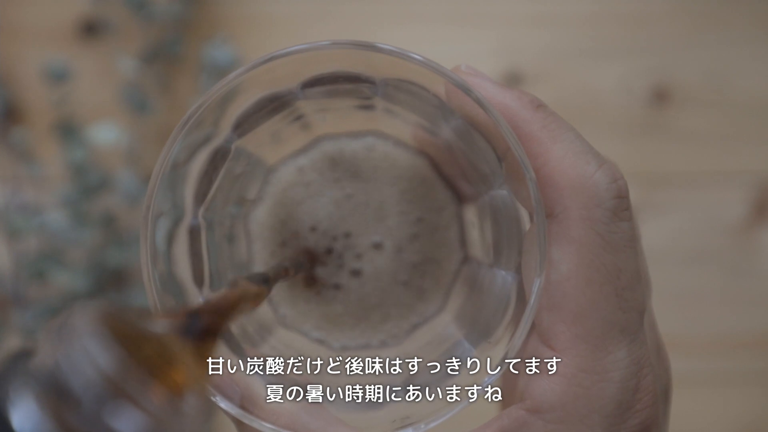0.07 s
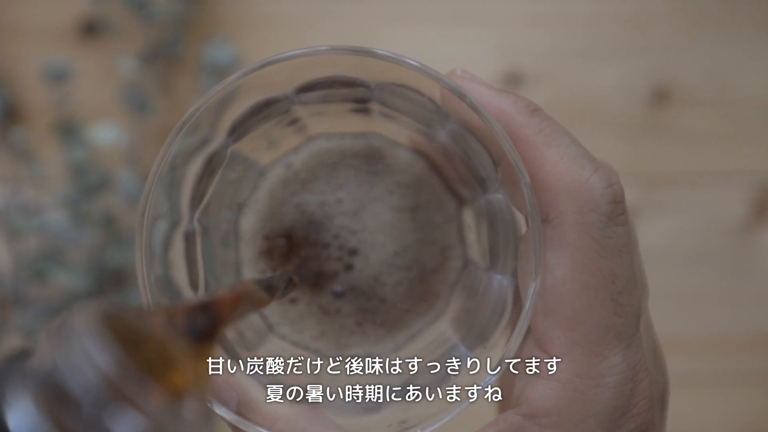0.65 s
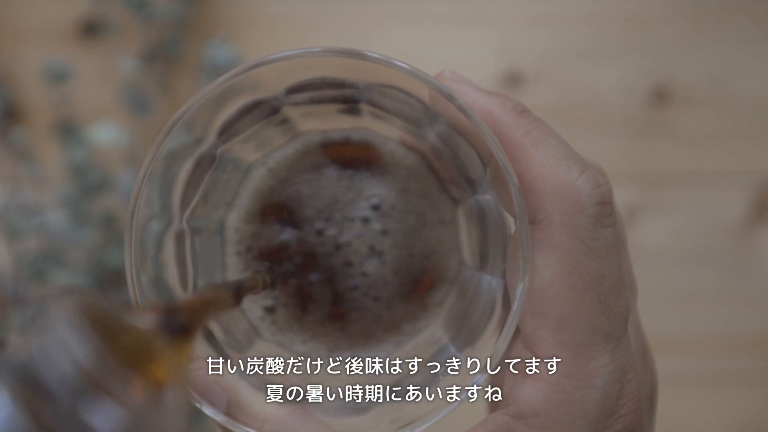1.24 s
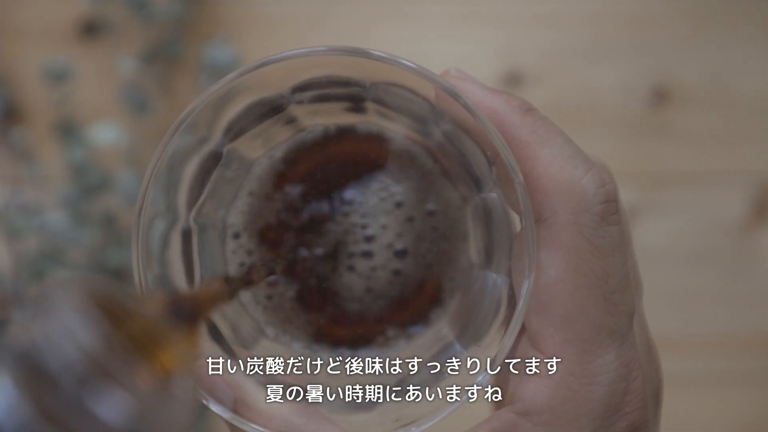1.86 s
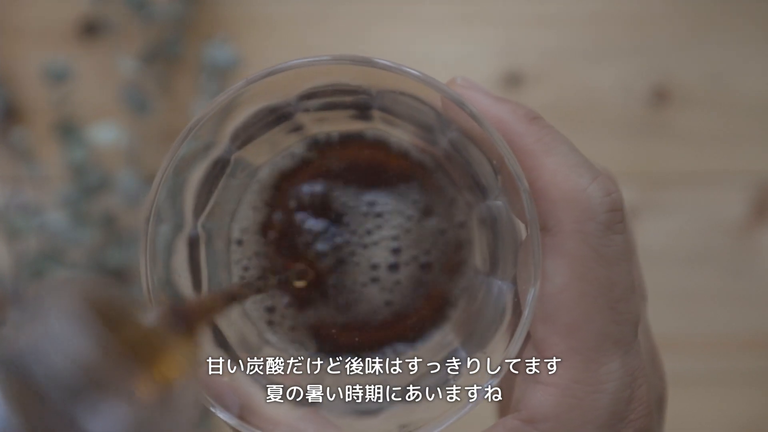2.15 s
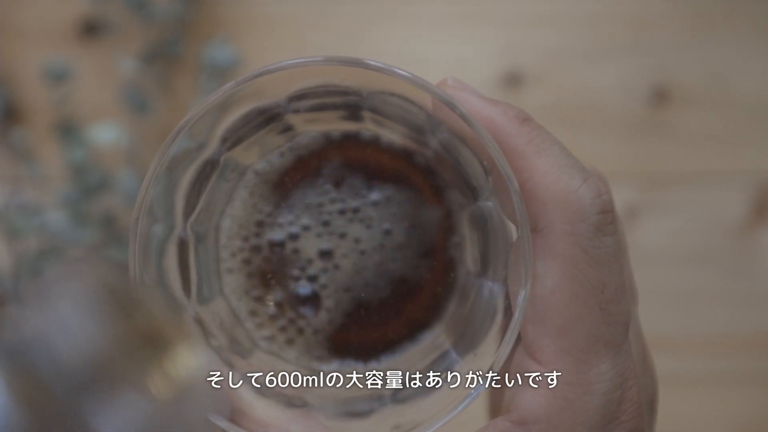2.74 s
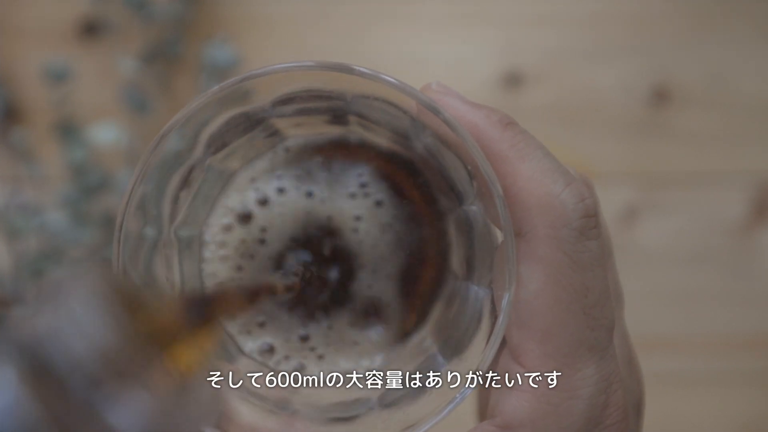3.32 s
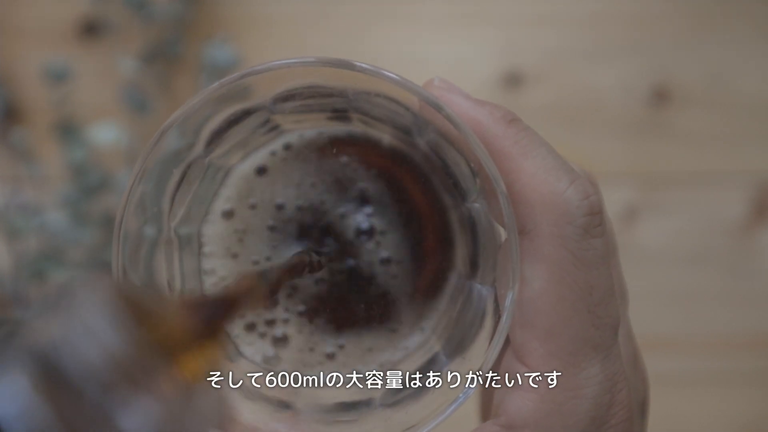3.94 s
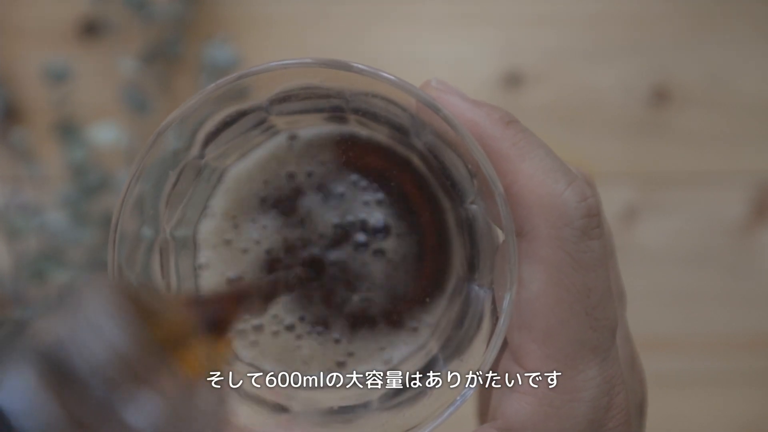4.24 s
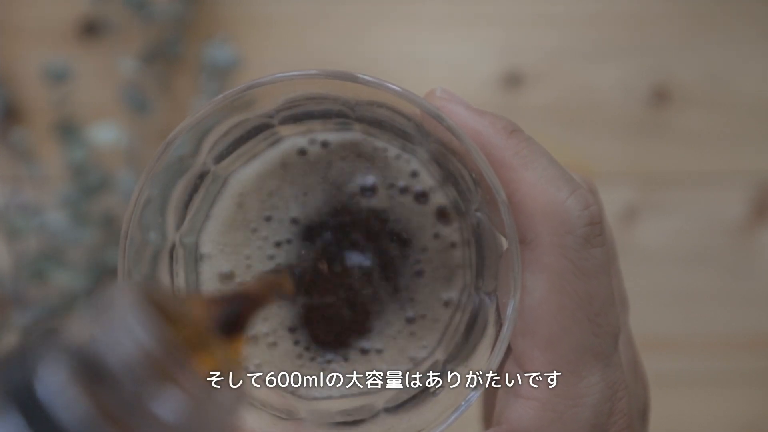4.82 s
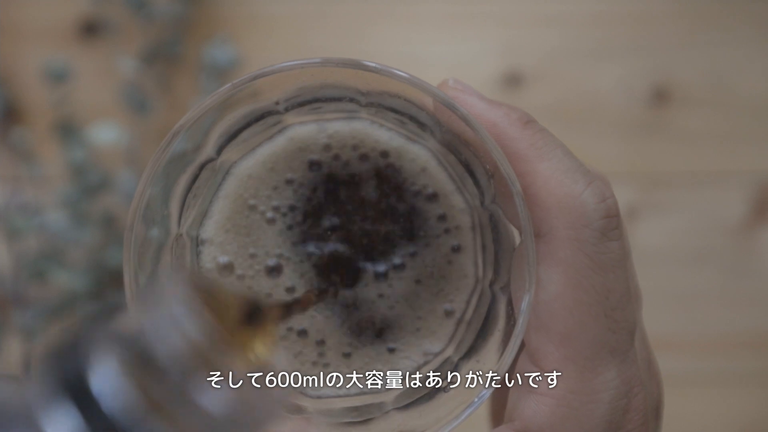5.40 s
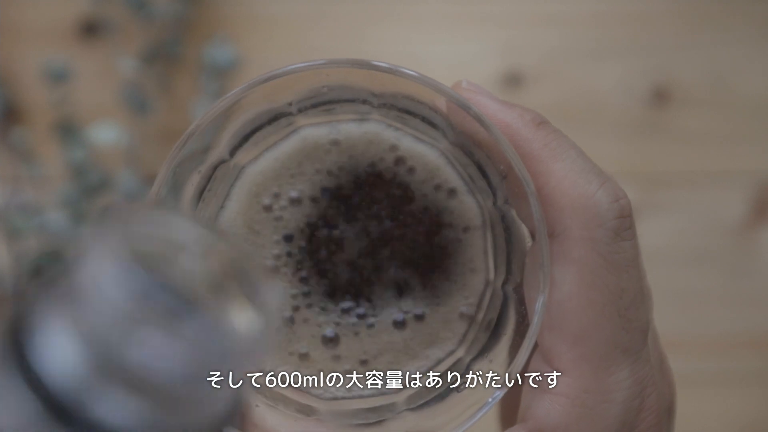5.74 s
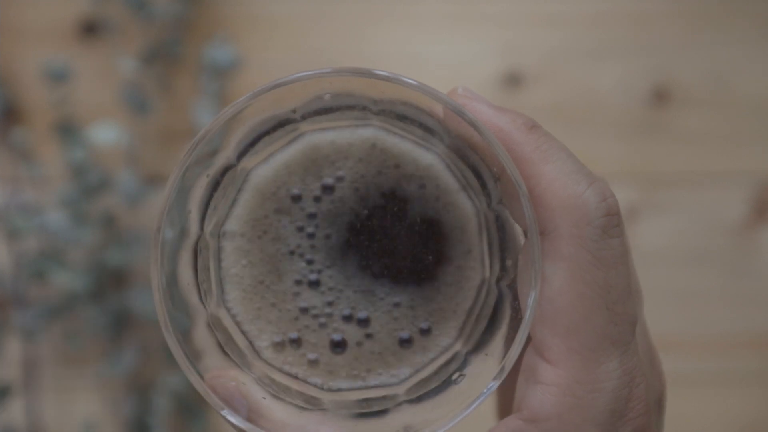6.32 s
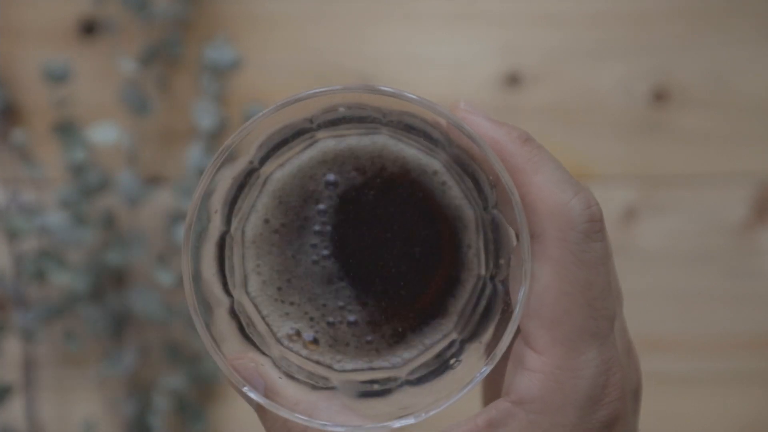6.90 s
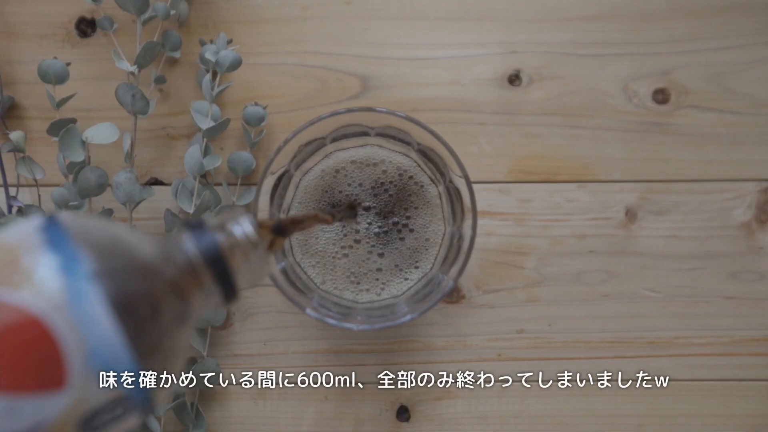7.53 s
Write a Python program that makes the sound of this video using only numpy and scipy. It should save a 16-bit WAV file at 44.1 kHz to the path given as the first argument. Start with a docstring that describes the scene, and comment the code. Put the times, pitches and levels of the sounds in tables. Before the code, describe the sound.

Close up, a carbonated drink splashes and plops into a hand-held glass in two pours, then fizzes as the foam settles.

```python
"""At a table in a quiet room, fizzy drink is poured twice into a glass held close to the microphone.
Trapped air plops and patters, the foam hisses, and the hollow of the glass rings higher as it fills.
The hand shifts on the glass with dull knocks at the start and the end.
In the last quarter second the sound cuts to a much fainter pour, farther off."""
import sys
import numpy as np
from scipy import signal
from scipy.fft import rfft, irfft
from scipy.io import wavfile
from scipy.ndimage import uniform_filter1d

SR = 44100
rng = np.random.default_rng(int(sys.argv[2]) if len(sys.argv) > 2 else 0)


def dump_mix(stems):
    """Bounce the given channels to the path in sys.argv[1] as a 16-bit WAV at rate SR."""
    frames = np.atleast_2d(stems).T  # one column per channel
    limited = np.clip(frames, -1, 1)  # hard clip at full scale
    pcm = np.round(limited * 32767).astype(np.int16)
    wavfile.write(sys.argv[1], SR, pcm)


N = 333396
TIME = np.arange(N) / SR
SIDE = np.array([[1], [-1]])  # opposite signs in the left and right channels


def gain_of(db):
    """Decibels to a factor."""
    return 10 ** (np.asarray(db) / 20)


def unit_rms(x):
    """Scales to rms 1."""
    return x / np.sqrt(np.mean(x ** 2) + 1e-20)


def follow(curve):
    """A curve's value at every sample."""
    return np.interp(TIME, *np.transpose(curve))


def add(mix, s, sound):
    """Mixes a sound in at time s."""
    part = mix[..., max(round(s * SR), 0):][..., :sound.shape[-1]]
    part += sound[..., :part.shape[-1]]


def coloured(x, points):
    """Gives x a spectrum, at rms 1."""
    hz, db = np.transpose(points)
    shape = np.interp(np.log(np.fft.rfftfreq(N, 1 / SR) + 1), np.log(hz), db)
    return unit_rms(irfft(rfft(x) * gain_of(shape), N))


def resonate(x, hz, width_hz):
    """A steady or moving resonance of gain 1."""
    turn = np.exp(2j * np.pi * np.cumsum(hz * np.ones(N)) / SR)
    decay = np.exp(-np.pi * width_hz / SR)
    return 2 * (turn * signal.lfilter([1 - decay], [1, -decay], x / turn + 1e-18)).real


def ring(x, modes):
    """Passes x through a set of resonances."""
    return sum(gain_of(db) * resonate(x, hz, width) for hz, width, db in modes)


def high_pass(x, hz):
    """Removes what lies under hz."""
    return signal.sosfilt(signal.butter(2, hz, "high", fs=SR, output="sos"), x)


def low_pass(x, hz, order=2):
    """Dulls what lies over hz."""
    return signal.sosfilt(signal.butter(order, hz, fs=SR, output="sos"), x)


def clicks(per_s, spread_db):
    """Random clicks of either sign, many small and a few large."""
    size = gain_of(spread_db * np.minimum(rng.exponential(1, N), 5))
    return size * rng.choice([-1, 1], N) * (rng.random(N) < per_s / SR)


def wander(length_s):
    """A random curve of rms 1 that changes over about length_s."""
    width = max(round(length_s * SR), 1)
    return unit_rms(uniform_filter1d(uniform_filter1d(rng.standard_normal(N), width), width))


# spectrum of the room at the microphone: (frequency [Hz], level [dB])
ROOM_SPECTRUM = [(20, -17), (50, -14.5), (135, -8), (240, -15.5), (800, -21), (1500, -44), (15000, -47.5)]
def room_tone(level_db=-55, side_db=-6):
    """Low murmur of the room's air, all around the microphone."""
    mid, side = coloured(rng.standard_normal((2, N)), ROOM_SPECTRUM)
    return gain_of(level_db) * (mid + gain_of(side_db) * side * SIDE)


# bouts in which the hand shifts on the glass: (start [s], end [s])
HANDLING_BOUTS = [(0.0, 0.75), (6.38, 7.4)]
# the firmest knocks: (time [s])
FIRM_KNOCKS = [0.077, 0.129, 0.17, 0.28, 0.374, 0.503, 0.585, 0.67, 6.459, 6.509, 6.625, 6.665, 6.765,
               6.833, 6.976, 7.11, 7.174]
def handling(firm_db=-36.5, light_db=-42.5, fade_db_per_s=6.5, gap_s=0.055):
    """Firm knocks with random light ones between, weakening through each bout; yields time and level."""
    for start, end in HANDLING_BOUTS:
        for s in FIRM_KNOCKS:
            if start <= s < end:
                yield s, firm_db - fade_db_per_s * (s - start)
        for s in np.arange(start, end, gap_s):
            db = light_db - fade_db_per_s * (s - start)
            yield s + gap_s * rng.random() / 2, db + 2 * rng.standard_normal()


# resonances that the knocks rattle: (frequency [Hz], width [Hz], level [dB])
RATTLE_RESONANCES = [(331, 45, 0.5), (417.4, 22, 9.5), (548, 26, 6.5), (720, 130, -0.5), (810, 41, -2)]
def knocks(thud_hz=92, thud_s=0.0089, rattle_s=0.0076, rattle_db=11):
    """Close up, each knock is a soft low thud and a short rattle that differs between the channels."""
    thuds, shakes, t = np.zeros(N), np.zeros((2, N)), np.arange(SR // 8) / SR
    thud_envelope = t / thud_s * np.exp(1 - t / thud_s)
    rattle_envelope = t / rattle_s * np.exp(1 - t / rattle_s)
    for s, db in handling():
        swing = np.sin(2 * np.pi * thud_hz * rng.uniform(0.89, 1.324) * t)
        add(thuds, s, gain_of(db) * thud_envelope * swing)
        add(shakes, s, gain_of(db) * rattle_envelope * rng.standard_normal((2, len(t))))
    left, right = low_pass(ring(shakes, RATTLE_RESONANCES), 1050, order=4)
    rattle = np.array([1.28 * left, right - 0.036 * left])  # the sides partly swing against each other
    return thuds * gain_of([[-1.6], [1.4]]) + gain_of(rattle_db) * rattle


# hiss of the foam, close up: (time [s], level [dB])
FOAM_LEVEL = [(0, -51.5), (.9, -47.5), (3.2, -47), (3.4, -45), (4.1, -47.5), (5.9, -48), (6.5, -46),
              (7.3, -48)]
# spectrum of that hiss: (frequency [Hz], level [dB])
FOAM_SPECTRUM = [(400, -29), (800, 3), (1900, -16.5), (2900, 0.5), (3900, -6.5), (5300, -2.5), (7500, 3.5),
                 (10000, 0.5), (13000, -2), (15000, -5)]
def foam(level_db=-0.34, wide_db=-13):
    """Thousands of tiny bubbles burst every second; the treble spreads widest across the microphone."""
    bursts = unit_rms(clicks(per_s=7000, spread_db=3.1)) + .3 * rng.standard_normal(N)
    side = coloured(clicks(per_s=7000, spread_db=3), [(3000, -13), (8000, -4), (11000, -8), (13000, -4)])
    hiss = coloured(bursts, FOAM_SPECTRUM) * gain_of([[-1.1], [1.1]])
    return gain_of(follow(FOAM_LEVEL) + level_db) * (hiss + gain_of(wide_db) * side * SIDE)


SURGE_S = 0.019  # time scale of the stream's surges and the sloshing
# main resonance of the air in the glass: (time [s], pitch [Hz])
HOLLOW_PITCH = [(1, 1200), (3.3, 1307), (4.5, 1325), (7, 1430)]
# how far the sloshing bends that pitch: (time [s], rms bend [share of pitch])
SLOSH_DEPTH = [(3.6, .008), (4, 0.078), (5.9, 0.015)]
def hollow_hz():
    """The pitch of the hollow climbs with the fill and wavers as the drink sloshes."""
    return follow(HOLLOW_PITCH) * (1 + follow(SLOSH_DEPTH) * wander(SURGE_S))


# clear ring of the hollow, which the foam damps: (time [s], level [dB])
CLEAR_RING_LEVEL = [(0, 17), (.95, 10.5), (1.3, 8.5), (5, -0.5)]
# a lower ring that shifts between the two pours: (time [s], pitch [Hz])
LOW_RING_PITCH = [(2.5, 930), (4.3, 846)]
# other resonances of the glass and its air: (frequency [Hz], width [Hz], level [dB])
GLASS_RESONANCES = [(1970, 650, 5), (1883, 103, -3), (2720, 490, 4), (3527, 99, 5), (4950, 2100, -1)]
def glass(x, hollow_db, low_db=-1):
    """The hollow of the glass colours what happens inside it on the way to the microphone."""
    hz = hollow_hz()
    hollow = resonate(x, hz, 330) + gain_of(follow(CLEAR_RING_LEVEL)) * resonate(x, hz, 67)
    low = gain_of(low_db) * resonate(x, follow(LOW_RING_PITCH), 77)
    return high_pass(gain_of(hollow_db) * (hollow + low) + ring(x, GLASS_RESONANCES), 740)


def bubble(hz, ring_s, rise):
    """A pinched-off bubble rings; its pitch flicks upward as it reaches the surface and dies."""
    t = np.arange(SR // 16) / SR
    envelope = np.exp(-(t / ring_s) ** 1.5) * (1 - np.exp(-t / .0002))
    pitch = hz * (1 + np.tanh(rise * (t / ring_s) ** 3))
    return envelope * np.sin(2 * np.pi * np.cumsum(pitch) / SR)


def patter(per_s=340, spread_db=1.9, sizes=24):
    """Small bubbles of many sizes, each a few cycles long; the glass colours them."""
    voices = [bubble(hz, 5 / hz, rise=.03) for hz in np.geomspace(900, 3600, sizes)]
    swarm = sum(signal.oaconvolve(clicks(per_s / sizes, spread_db), voice)[:N] for voice in voices)
    return unit_rms(glass(swarm, hollow_db=2.5))


def splats(decay_s=0.0035, spray_db=-9, spray_hz=7500):
    """Lumps of the stream slap the surface: short bursts that sound the glass and throw fine spray."""
    t = np.arange(SR // 40) / SR
    envelope = signal.oaconvolve(abs(clicks(per_s=80, spread_db=1.5)), np.exp(-t / decay_s))[:N]
    bursts = envelope * rng.standard_normal(N)
    spray = resonate(high_pass(bursts, 3200), spray_hz, 2500)
    slaps = low_pass(glass(bursts, hollow_db=6), 5200)
    return unit_rms(slaps) + gain_of(spray_db) * unit_rms(spray)


# strength of the stream through both pours and their last dribbles: (time [s], level [dB])
FLOW_LEVEL = [(0, -48), (.9, -48.5), (1.55, -52), (1.98, -43.5), (2.47, -42), (2.65, -60), (2.76, -40),
              (2.86, -64), (3.23, -62), (3.32, -40), (3.56, -43.5), (3.72, -49.5), (4.07, -51.5),
              (4.15, -43), (4.5, -43), (4.9, -61), (5.58, -45), (5.7, -65)]
# deep resonance of the air around the drink: (time [s], pitch [Hz])
DEEP_PITCH = [(0, 440), (1.85, 476), (2.4, 541), (4, 520)]
# that resonance fades as the glass fills: (time [s], level [dB])
DEEP_LEVEL = [(4, 1.5), (5, -24)]
def stream(surge_db=2.5, patter_db=-2, splat_db=-7, deep_db=-17, crackle_db=-10):
    """The stream slaps the drink and beats air into it in random surges; froth adds to the patter."""
    pouring = TIME < FLOW_LEVEL[-1][0]
    surge = pouring * gain_of(follow(FLOW_LEVEL) + surge_db * wander(SURGE_S))
    deep_hz = follow(DEEP_PITCH)
    deep = unit_rms(resonate(resonate(clicks(per_s=300, spread_db=2), deep_hz, 90), deep_hz, 90))
    small_bubbles = patter()
    crackle = unit_rms(high_pass(clicks(per_s=110, spread_db=3), 8000))
    churn = gain_of(patter_db) * small_bubbles + gain_of(deep_db + follow(DEEP_LEVEL)) * deep
    surface = gain_of(splat_db) * splats() + gain_of(crackle_db) * crackle
    return surge * (churn + surface) + froth() * small_bubbles


# simmer of the churned drink: (time [s], level [dB])
SIMMER_LEVEL = [(0, -49), (.9, -47), (1.55, -52.5), (2.3, -58), (2.65, -58), (3.2, -55.5), (3.4, -48),
                (4.95, -44.5), (5.5, -45.5), (6.4, -47), (7.3, -55.5)]
def simmer():
    """The churned drink simmers in the glass during, between and after the pours."""
    bursts = clicks(per_s=2500, spread_db=0)
    return gain_of(follow(SIMMER_LEVEL)) * unit_rms(glass(bursts, hollow_db=9))


PLOP_CYCLES, PLOP_SPLASH_S, POP_SPLASH_S = 9.5, .0035, .0028  # decay of a plop's ring and of splashes
# bubbles bursting at the surface: (time [s], level [dB], pitch [Hz])
SURFACE_POPS = [(0.0768, -24, 1200), (0.18, -27, 1310), (0.371, -27.5, 1260), (0.818, -28.5, 2440),
                (0.882, -29.5, 2800), (1.298, -25.5, 1150), (1.95, -28.5, 2220), (2.013, -24, 1150),
                (2.1004, -25.5, 1250), (2.2803, -22.5, 1120), (2.357, -23, 1170), (2.421, -29, 1210),
                (2.4387, -19.5, 1810), (2.4725, -19.5, 1250), (2.5535, -26.5, 1420), (3.266, -24, 1250),
                (3.3765, -20, 1000), (3.4024, -26, 2000), (3.502, -21, 1110), (3.8636, -23.5, 1170),
                (3.894, -23, 1200), (3.935, -23.5, 1310), (4.113, -26.5, 1780), (4.139, -23, 1380),
                (4.179, -27, 1500), (4.2251, -18, 1350), (4.246, -15.5, 1360), (4.309, -19.5, 1200),
                (4.375, -20.5, 1200), (4.443, -25, 1210), (4.4695, -22, 1290), (4.48, -21.5, 1360),
                (4.495, -25.5, 1500), (4.567, -25.5, 2720), (4.609, -27.5, 1530), (4.7266, -20.5, 1710),
                (4.999, -27, 1360), (5.036, -23, 2210), (5.051, -25, 900), (5.184, -24.5, 2340),
                (5.268, -26, 1500), (5.452, -24, 3180), (5.4738, -24, 1810), (5.5988, -18.5, 1630)]
# large air bubbles ringing under the surface: (time [s], level [dB], pitch [Hz])
AIR_PLOPS = [(0.492, -30, 1173), (0.9274, -28.5, 1177), (1.1064, -30.5, 2050), (1.16, -36, 2130),
             (1.27, -32.5, 2700), (1.716, -32, 2510), (1.814, -25, 2810), (2.101, -35, 513),
             (2.23, -28.5, 4470), (2.249, -10, 1323), (2.273, -16, 2040), (2.273, -15.5, 2700),
             (2.332, -23.5, 4240), (2.408, -30.5, 1250), (2.4538, -23.5, 1143), (2.5728, -20, 1276),
             (2.593, -31.5, 674), (3.245, -30.5, 1160), (3.29, -21, 1170), (3.3139, -22.5, 1720),
             (3.4125, -26.5, 2070), (3.435, -26, 1183), (3.4816, -21.5, 1405), (3.4976, -22, 1270),
             (3.5526, -29, 3500), (3.5767, -25, 1280), (3.589, -8.5, 1133), (3.591, -32.5, 492),
             (3.611, -9.5, 1296), (3.629, -18.5, 1180), (3.824, -30, 587), (3.895, -33, 547),
             (3.937, -24.5, 3530), (5.3444, -28.5, 2080), (5.385, -30.5, 1287), (5.556, -28, 2570),
             (5.6, -28, 1230), (5.624, -33, 1300)]
def large_bubbles(pop_ring_s=.0022, satellite_db=-10, linger_db=-14, deep_db=-2):
    """Plops ring on, pops and the thumps of glugs only briefly; each splashes and sounds the glass."""
    tones, splashes, t = glugs(), np.zeros(N), np.arange(SR // 25) / SR
    plops = [(s, db, hz, PLOP_CYCLES / hz, -13.5, PLOP_SPLASH_S) for s, db, hz in AIR_PLOPS]
    pops = [(s, db, hz, pop_ring_s, -11.5, POP_SPLASH_S) for s, db, hz in SURFACE_POPS + DEEP_GLUGS]
    for s, db, hz, ring_s, splash_db, splash_s in plops + pops:
        add(tones, s, gain_of(db) * bubble(hz, ring_s, rise=0.0313))
        add(splashes, s, gain_of(db + splash_db) * np.exp(-t / splash_s) * rng.standard_normal(len(t)))
    for s, db, _ in AIR_PLOPS:  # each plop sheds a small bubble that chirps upward
        delay_s, small_hz = rng.uniform([0, 1900], [PLOP_SPLASH_S, 3300])
        satellite = bubble(small_hz, 1.3 * PLOP_CYCLES / small_hz, rise=0.13)
        add(tones, s + delay_s, gain_of(db + satellite_db) * satellite)
    # the air in the glass rings on after the bubble has died
    linger = gain_of(linger_db) * resonate(tones, hollow_hz(), 82)
    deep = gain_of(deep_db + follow(DEEP_LEVEL)) * resonate(tones + 2 * splashes, follow(DEEP_PITCH), 36)
    splash_ring = low_pass(glass(splashes, hollow_db=14.5), 4870)
    return high_pass(tones + linger + splash_ring, 670) + deep


def froth(decay_s=0.018, level_db=-36.5):
    """Strength of the clump of small bubbles that each large one leaves."""
    out, t = np.zeros(N), np.arange(SR // 8) / SR
    for s, db, _ in AIR_PLOPS + SURFACE_POPS + DEEP_GLUGS:
        add(out, s, gain_of(db / 2 + level_db) * np.exp(-t / decay_s))
    return out


# pockets of air collapsing in the drink: (time [s], level [dB], pitch [Hz])
DEEP_GLUGS = [(0.6054, -25, 988), (1.8375, -18, 948), (2.4865, -18, 923), (3.3006, -14, 719),
              (4.389, -26.5, 788)]
def glugs(tail_db=-10.5, tail_cycles=21, roughness=0.26):
    """After its thump a glug rings on, low and unsteady, while the pocket of air wobbles."""
    out, t = np.zeros(N), np.arange(SR // 8) / SR
    for s, db, hz in DEEP_GLUGS:
        wobble, bend = (roughness * wander(2 / hz)[:len(t)] for _ in range(2))
        envelope = np.exp(-t * hz / tail_cycles) * (1 - np.exp(-t * hz))
        add(out, s, gain_of(db + tail_db) * envelope * (1 + wobble) * np.sin(2 * np.pi * hz * t + bend))
    return out


# flung drops, close to the microphone: (time [s], level [dB])
DROP_TICKS = [(2.247, -19), (2.2732, -8.5), (2.5741, -21), (3.2905, -22.5), (3.377, -24.5), (3.444, -37),
              (3.5895, -18.5), (3.61, -22.5), (3.8235, -26), (3.9375, -25), (4.1543, -22), (4.2454, -19),
              (4.9985, -27), (5.051, -26.5), (5.4732, -25)]
def drop_ticks(level_db=6, rise_s=.00036, edge_hz=3000, edge_hz_per_db=200):
    """Flung drops make bright cracks, a millisecond long; the weaker they are, the thinner."""
    out, t = np.zeros(N), np.arange(SR // 50) / SR
    for s, db in DROP_TICKS:
        crack = t / rise_s * np.exp(1 - t / rise_s) * rng.standard_normal(len(t))
        cutoff_hz = edge_hz - edge_hz_per_db * db
        add(out, s, gain_of(db) * high_pass(high_pass(crack, cutoff_hz), cutoff_hz))
    return gain_of(level_db) * low_pass(out, 9600)


# crackle of coarse bubbles, close and central: (time [s], level [dB])
PRICKLE_LEVEL = [(3.2, -55), (3.35, -44), (4, -63), (4.7, -48), (6.5, -79)]
def prickle(hz=5500, width_hz=1300):
    """Coarser bubbles crackle, most of all in the fresh foam of the second pour."""
    bursts = high_pass(clicks(per_s=900, spread_db=2.6), 3500)
    return gain_of(follow(PRICKLE_LEVEL)) * unit_rms(resonate(bursts, hz, width_hz))


# splashes farther from the microphone: (time [s], level [dB])
DISTANT_SPLASHES = [(7.39, -41), (7.495, -40)]
def faint_pour(patter_db=-62, hiss_db=-64, hollow_db=-59, spray_db=-2, splash_hz=1320):
    """From farther off, little is left but a light patter, two ringing splashes and a dull hiss."""
    drips = clicks(per_s=700, spread_db=1.5)
    hiss = coloured(rng.standard_normal(N), [(6000, -2), (15000, -12)])
    hz = follow(HOLLOW_PITCH)
    hollow = unit_rms(resonate(resonate(drips, hz, 300), hz, 300))
    splashes, t = np.zeros(N), np.arange(SR // 16) / SR
    tone = bubble(splash_hz, PLOP_CYCLES / splash_hz / 2, rise=0)
    for s, db in DISTANT_SPLASHES:
        burst = np.exp(-t / POP_SPLASH_S) * rng.standard_normal(len(t))
        spray = low_pass(high_pass(burst, 1500), 5500)
        add(splashes, s, gain_of(db) * (tone + gain_of(spray_db) * spray))
    light_patter = gain_of(patter_db) * unit_rms(glass(drips, hollow_db=-7))
    return light_patter + gain_of(hollow_db) * hollow + gain_of(hiss_db) * hiss + splashes


def reflections(x, t60_s=0.074, delay_s=.003, mid_db=-14, wide_db=-23):
    """A short, weak tail reaches the microphone from the table and the walls."""
    t = np.arange(SR // 3) / SR
    taps = rng.standard_normal((2, len(t))) * gain_of(-60 * t / t60_s) * (t > delay_s)
    taps /= np.linalg.norm(taps[0])
    mid, side = signal.fftconvolve(low_pass(x, 13000)[None], taps, axes=1)[:, :N]
    return gain_of(mid_db) * mid + gain_of(wide_db) * side * SIDE


def scene(cut_s=7.313):
    """The near pour, a little right of the microphone, gives way abruptly to the faint one."""
    liquid = large_bubbles() + drop_ticks() + stream() + simmer()
    near = liquid * gain_of([[-.6], [.6]]) + reflections(liquid) + foam() + prickle()
    return np.where(TIME < cut_s, near, faint_pour()) + knocks() + room_tone()


def record(dry):
    """The recorder rounds off the loudest peaks and cuts the highest treble."""
    rounded = .5 * np.tanh(dry / .5)
    band_limit = signal.firwin(511, 15200, window=("kaiser", 9), fs=SR)
    return signal.oaconvolve(rounded, band_limit[None], "same")


dry = scene()
out = record(dry)
dump_mix(out)
```